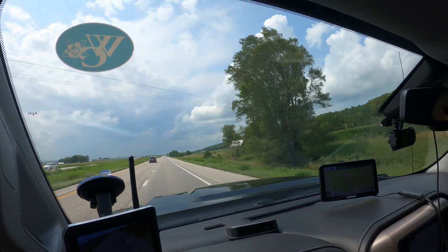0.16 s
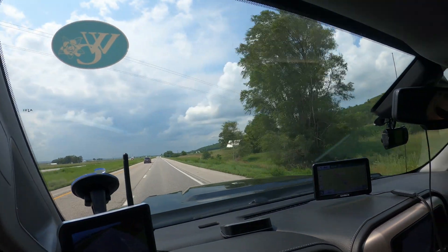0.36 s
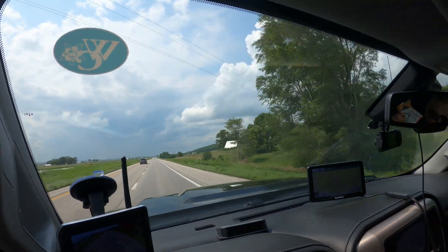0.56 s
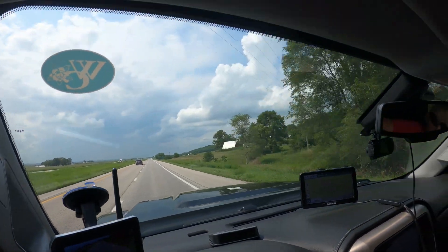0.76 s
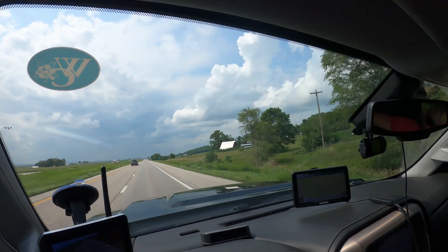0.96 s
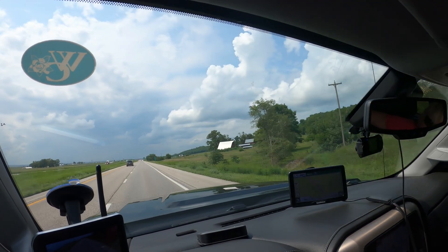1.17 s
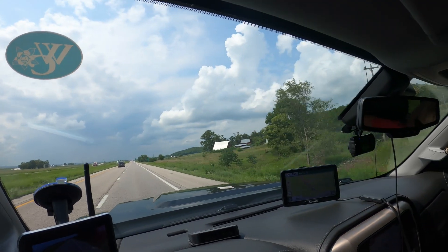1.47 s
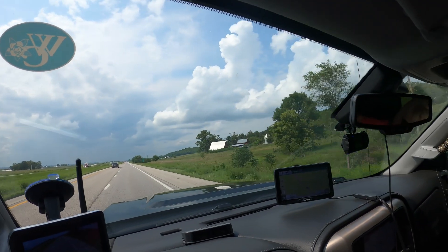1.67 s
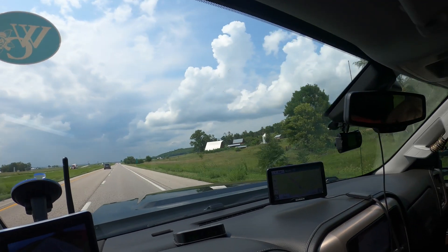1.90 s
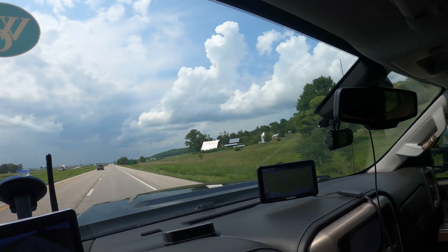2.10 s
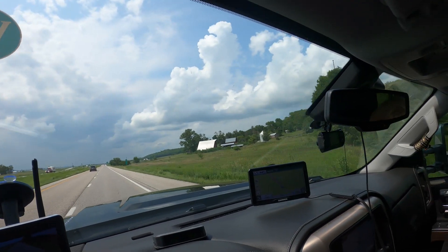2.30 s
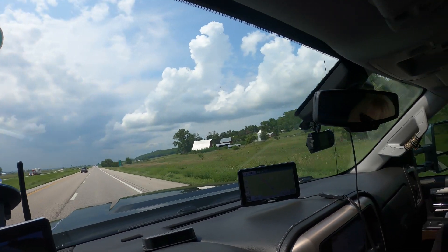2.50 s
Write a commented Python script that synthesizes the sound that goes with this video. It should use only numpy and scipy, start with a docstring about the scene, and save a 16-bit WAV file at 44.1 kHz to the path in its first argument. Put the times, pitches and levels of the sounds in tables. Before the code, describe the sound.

Deep, bassy road roar and engine hum fill a truck cab at steady highway speed, while plastic trim rattles in a quick cluster, creaks faintly, rattles on steadily, then gives small squeaks; close, dull interior microphone.

```python
"""Inside a truck cab at highway speed, 2.65 s. Throughout: wind hiss and tyre roar (coloured noise), cab booms and a
faint tyre whine (resonances, a drifting sine), a deep thrum (fluttering sine), engine hum (sines), rustling trim (grains).
Rattles (ringing noise bursts) crowd the first quarter second; a long creak (resonant noise) follows at 0.55 s.
From 0.87 s rattles come steadily, with a few squeaks (resonant noise).
After 2.1 s squeaks crowd in, with one bright tick, and rattles thin out."""
import sys
import numpy as np
from scipy import signal
from scipy.fft import rfft, irfft
from scipy.io import wavfile
from scipy.ndimage import uniform_filter1d

SR = 44100
rng = np.random.default_rng(int(sys.argv[2]) if len(sys.argv) > 2 else 0)


def dump(signal):
    """Clip the signal to [-1, 1] and save it as 16-bit WAV at the path in sys.argv[1]."""
    limited = np.clip(np.atleast_2d(signal).T, -1, 1)
    pcm = np.round(limited * 32767).astype(np.int16)
    wavfile.write(sys.argv[1], SR, pcm)


N = 116865

# wind hiss spectrum, relative: hz, density_db_per_hz
HISS_SPECTRUM = [(880, -31.5), (1500, -4), (1920, 10.5), (4900, -2), (7320, -39.5), (10800, -43),
                 (12500, -45), (15600, -59)]
HISS_RMS_DB = -62.5

# tyre roar spectrum, relative: hz, density_db_per_hz
ROAR_SPECTRUM = [(8.8, -40), (15, -12), (37, 0), (91, -2), (155, -8.5), (188, -17), (287, -17),
                 (386, -25.5), (421, -29), (591, -29), (731, -31.5), (1050, -37), (1680, -43), (1850, -50),
                 (2400, -55), (3120, -72.5), (5280, -120)]
ROAR_RMS_DB, ROAR_PATCH_DB = -20, 0.59
# cab resonances rung by the road, and a faint tyre whine at 1317 Hz: centre_hz, width_hz, level_db
ROAD_RESONANCES = [(50.4, 3.6, -36.5), (96.8, 5, -31), (150.7, 20.5, -37.5), (186.6, 11, -43),
                   (277.4, 23.3, -42.5), (304.7, 8.3, -44), (366.2, 26, -54), (423.8, 23, -48),
                   (509.6, 37, -52.5), (746, 166, -53), (1317, 28, -60)]
ROAD_STEADINESS, ROAD_DRIFT_RATIO = 0.64, 0.015  # steadiness 0..1; drift rms / centre
# strongest cab boom: time_s, level_db
MAIN_BOOM_LEVEL = [(0.0, -24.5), (0.12, -20.5), (0.32, -44), (0.39, -18), (0.47, -61), (0.58, -21),
                   (0.71, -47.5), (0.86, -15), (0.92, -25.5), (1.09, -17.5), (1.13, -45.5), (2.15, -29),
                   (2.21, -26), (2.25, -34), (2.38, -17), (2.49, -48), (2.58, -42), (2.65, -16.5)]
MAIN_BOOM_HZ, MAIN_BOOM_DRIFT_HZ = 80.97, 3.26  # drift is rms
# surges: time_s, first_firing_order_rms_db, road_low_mid_change_db
SURGE = [(0.0, -43, -5), (0.07, -28, 2), (0.15, -49, -2), (0.28, -28, -0.5), (0.56, -29.5, -0.5),
         (0.64, -48, 0), (0.71, -29, -1), (1.05, -26.5, 1.5), (1.08, -37, -1), (1.63, -25, -0.5),
         (1.71, -32.5, 1.5), (2.65, -28.5, -0.5)]

# low thrum of the cab: time_s, level_db (before flutter), pitch_hz
THRUM = [(0.0, -20.5, 41.1), (0.16, -28.5, 40.45), (0.24, -31.5, 35.22), (0.64, -22.5, 36.04),
         (0.91, -34, 31.9), (0.97, -15, 30.7), (1.02, -25, 32.05), (1.19, -27, 31.5), (1.3, -19, 34.85),
         (1.46, -46, 33.77), (1.5, -20.5, 34.03), (1.68, -21.5, 32.5), (2.07, -25.5, 32.98),
         (2.18, -22.5, 29.06), (2.28, -31.5, 29), (2.37, -25.5, 31.7), (2.53, -23, 33.04),
         (2.65, -45, 33.4)]
THRUM_FLUTTER_DB, THRUM_FLUTTER_S = 4, 0.03  # rms depth, smoothing window

# upper engine firing orders: multiple, rms_db
UPPER_FIRING_ORDERS = [(2, -44), (3, -53.5), (4, -52.5)]
FIRING_HZ, FIRING_WOBBLE_RATIO = 116, 0.00396  # wobble rms / pitch

# loose trim spectrum, relative: hz, density_db_per_hz
TRIM_SPECTRUM = [(880, -13), (1500, 5.5), (1880, 0.5), (2050, -2), (2830, 0.5), (3950, -3), (7620, -12),
                 (9080, -20), (12500, -28), (15600, -38.5)]
# shaking of the trim: time_s, below_treble_db, treble_db
TRIM_SHAKE = [(0, -46.5, -55.5), (.15, -55.5, -60.5), (.24, -52.5, -63), (.27, -59, -68), (.36, -51, -68),
              (.42, -56, -65.5), (.5, -64, -72), (.56, -56.5, -69.5), (.65, -67, -63), (.74, -60, -71),
              (.79, -67.5, -80), (.85, -59.5, -63), (.91, -51, -67), (.97, -54, -61), (1.03, -50.5, -65),
              (1.11, -51, -57.5), (1.16, -51.5, -63), (1.22, -63, -70.5), (1.3, -67, -68),
              (1.35, -67, -76.5), (1.42, -62, -77), (1.46, -51.5, -61.5), (1.52, -53.5, -70),
              (1.565, -56, -72), (1.6, -53.5, -69.5), (1.67, -54, -70.5), (1.72, -64.5, -83),
              (1.78, -49.5, -68), (1.84, -54, -70.5), (1.92, -57, -76), (2.01, -53.5, -71),
              (2.06, -56.5, -76), (2.14, -55.5, -69), (2.2, -59, -75), (2.26, -52.5, -86),
              (2.34, -62.5, -82.5), (2.41, -58, -88), (2.44, -54.5, -84), (2.49, -50, -83),
              (2.56, -64.5, -95.5), (2.65, -76, -86)]
GRAINS_PER_S, GRAIN_SPREAD_DB, GRAIN_T60_S = 3000, 2.2, 0.015
FINE_PATCH_DB, COARSE_PATCH_DB = 1.5, 2

# squeaks of rubbing plastic, with the first rattle's ring (0.001 s) and one bright tick (2.106 s):
# start_s, length_s, centre_hz, width_hz, start_level_db, fade_db
SQUEAKS_AND_TICK = [(0.001, .014, 3030, 300, -49, -6), (0.329, 0.081, 3380, 300, -61.5, -1),
                    (0.46, 0.017, 4070, 120, -48.5, -4.5), (0.453, 0.03, 4600, 250, -56, -5),
                    (0.508, 0.26, 4690, 300, -68, -2), (0.959, 0.06, 3160, 120, -54.5, -3),
                    (1.457, 0.042, 3630, 248, -55, -3.5), (1.459, 0.071, 4840, 300, -60.5, -5),
                    (1.603, 0.047, 3980, 200, -59, -5), (2.088, 0.027, 3400, 120, -56, -3),
                    (2.094, .07, 3540, 110, -60.5, -2), (2.098, 0.11, 7000, 499, -70.5, -4),
                    (2.106, .018, 12900, 3500, -69, -5), (2.121, 0.05, 2576, 80, -59.5, -3),
                    (2.219, 0.05, 3350, 100, -55, -1.5), (2.272, 0.065, 3340, 80.3, -59.5, -4.5),
                    (2.35, 0.037, 3320, 70, -59, -4.5), (2.42, 0.065, 4650, 300, -59.5, -3.5),
                    (2.428, 0.057, 3660, 148.8, -63, 0), (2.409, 0.13, 12500, 2000, -73, -13)]
SQUEAK_STEADINESS = 0.7
# resonances of the long creak: centre_hz, width_hz, relative_db
CREAK_RESONANCES = [(5640, 150, -7), (6090, 300, -4), (6700, 300, -1), (6900, 150, -4), (7560, 80, -3),
                    (7790, 100, -3), (8340, 200, -6), (8820, 200, -9), (7500, 3000, -2), (12100, 700, -12),
                    (13000, 400, -15)]
CREAK_START_S, CREAK_LENGTH_S, CREAK_DB = 0.55, 0.22, -63  # level before the swell window

# rattles: full_level_s, level_db (6 dB above burst rms), ring_hz, ring_db, treble_change_db,
# length_s (rise included, decay not), upper_ring_hz, upper_ring_db
RATTLES = [(0.002, -40, 4470, 8, 3, 0.01, 6130, 15), (0.038, -37, 4560, 0, -2, 0.0059, 5610, -9),
           (0.053, -38, 2900, 15, -5, 0.0092, 5410, -15), (0.0695, -35.5, 2810, 2, 5, 0.0096, 6600, 2),
           (0.096, -43, 2780, -5, 7, 0.012, 5670, -16), (0.134, -42.5, 2560, -17, 4, 0.0088, 5420, -10),
           (0.177, -46.5, 2580, -12, 1, 0.013, 7770, -8), (0.208, -41, 2730, 3, 7, 0.013, 5270, -26),
           (0.223, -43, 2660, 4, 19.5, 0.0094, 5700, -24), (0.439, -43, 2930, -3, 9, 0.012, 5280, -7),
           (0.4585, -43, 4060, -19, 9.5, 0.016, 7420, -8), (0.869, -40.5, 3030, -2, 6, 0.019, 5190, -20),
           (0.8844, -40.5, 4280, 0, 8, 0.014, 5050, -10), (0.934, -55, 3120, -10, 0, 0.012, 5710, -10),
           (0.988, -50, 3140, -9, 10, 0.012, 5970, -10), (1.002, -44, 3080, -13, 20, 0.015, 5030, -3),
           (1.051, -38.5, 3000, 3, 9.5, 0.014, 5910, -21), (1.112, -42.5, 3110, -7, 1, 0.0088, 6700, 1),
           (1.142, -43.5, 3350, -5, 1, 0.01, 5410, -13), (1.176, -42, 2790, -13, 11, 0.012, 5010, -15),
           (1.244, -42.5, 2800, -2, 5, 0.01, 5030, -16), (1.274, -48.5, 2924, -13, 19, 0.011, 7150, -5),
           (1.319, -53, 3160, -3, 4, 0.012, 5000, -3), (1.388, -42, 2480, -1.5, 2, 0.01, 5220, -18),
           (1.449, -41.5, 2790, -12, -1, 0.0082, 5170, -11), (1.48, -47, 2530, 5, -6, 0.012, 5280, -10),
           (1.581, -49.5, 2510, -14, 8, 0.02, 5090, 3), (1.623, -47, 2820, -1, -4, 0.0097, 5130, -4),
           (1.799, -52, 3360, -6, 3, 0.021, 5180, -3), (1.869, -46.5, 3210, -10, 6, 0.014, 5120, -14),
           (1.9696, -40, 2805, -8.5, -11, 0.0089, 5107, -12), (1.992, -47, 2830, -7.5, 2, 0.0094, 4930, -5),
           (2.016, -50.5, 2520, -1, 5, 0.011, 6690, -11), (2.101, -59, 3570, -8, 3, 0.012, 6930, -12),
           (2.247, -50, 3300, 1, 3, 0.011, 5210, -8), (2.472, -58, 2720, 3, 6, 0.01, 5080, -10)]
RATTLE_RISE_S, RATTLE_T60_S, RATTLE_RING_WIDTH_HZ, RATTLE_GRIT_DB = 0.003, 0.047, 410, 1

LIMIT, FADE_IN_S, BAND_EDGE_HZ = 0.6, 0.002, 15700  # LIMIT is full-scale amplitude


def amp(db):
    """Amplitude of a level in dB."""
    return 10 ** (np.asarray(db) / 20)


def evened(x):
    """Scales to rms 1."""
    return x / np.sqrt(np.mean(x ** 2) + 1e-20)


def curve(rows, column=1):
    """A table column interpolated linearly over the scene."""
    rows = np.array(rows)
    return np.interp(np.arange(N) / SR, rows[:, 0], rows[:, column])


def sine(hz):
    """A sine of rms 1 following a pitch curve."""
    return np.sqrt(2) * np.sin(2 * np.pi * np.cumsum(hz) / SR)


def add(mix, start_s, sound):
    """Mixes a sound in place, cut at the end of the scene."""
    part = mix[max(round(start_s * SR), 0):][:len(sound)]
    part += sound[:len(part)]


def colour(x, points):
    """Filters by a dB spectrum on a log-frequency axis, falling away below its first point."""
    point_hz, point_db = np.transpose(points)
    hz = np.fft.rfftfreq(len(x), 1 / SR) + 1
    gain = amp(np.interp(np.log(hz), np.log(point_hz), point_db))
    low_cut = np.minimum(hz / point_hz[0], 1) ** 4
    return irfft(rfft(x) * gain * low_cut, len(x))


def treble(x):
    """The band above 6300 Hz, without phase shift."""
    return signal.sosfiltfilt(signal.butter(3, 6300, "high", fs=SR, output="sos"), x)


def resonate(x, hz, width_hz):
    """A one-pole resonance of gain 1: shift to 0 Hz, smooth, shift back."""
    turn = np.exp(2j * np.pi * np.cumsum(hz * np.ones(len(x))) / SR)
    pole = np.exp(-np.pi * abs(width_hz) / SR)
    return 2 * (turn * signal.lfilter([1 - pole], [1, -pole], x / turn)).real


def ringing(noise, hz, width_hz, steady):
    """Noise through a steep resonance, its swells evened out as far as steady (0..1) asks."""
    x = evened(resonate(resonate(noise, hz, width_hz), hz, width_hz))
    power = uniform_filter1d(x ** 2, int(2 * SR / np.mean(hz)))  # over two cycles
    return evened(x / (power + 0.1) ** (np.clip(steady, 0, 1) / 2))


def patchy(x, patch_db, size, wide, long):
    """Random louder and softer patches in time and frequency."""
    _, _, bins = signal.stft(x, SR, nperseg=size)
    patches = uniform_filter1d(rng.standard_normal(bins.shape), size=wide, axis=0)
    patches = evened(uniform_filter1d(patches, size=long, axis=1))
    return evened(signal.istft(bins * amp(patch_db * patches), SR, nperseg=size)[1][:len(x)])


def sway(size):
    """A random sway of rms 1: noise smoothed over size samples."""
    return evened(uniform_filter1d(rng.standard_normal(N), size=size))


def smooth_sway(size, second_size):
    """A random sway of rms 1, smoothed twice."""
    return evened(uniform_filter1d(sway(size), size=second_size))


def wind():
    """Smooth faint hiss: steady coloured noise."""
    return amp(HISS_RMS_DB) * evened(colour(rng.standard_normal(N), HISS_SPECTRUM))


def surged(x):
    """The low-mid band rises and falls."""
    body = signal.sosfiltfilt(signal.butter(2, [140, 380], "band", fs=SR, output="sos"), x)
    return x + (amp(curve(SURGE, column=2)) - 1) * body


def booms_and_whine():
    """Cab booms and a tyre whine: noise through resonances whose centres drift slowly."""
    out = np.zeros(N)
    for hz, width_hz, level_db in ROAD_RESONANCES:
        drifting_hz = hz * (1 + ROAD_DRIFT_RATIO * smooth_sway(12000, 6000))
        out += amp(level_db) * ringing(rng.standard_normal(N), drifting_hz, width_hz, ROAD_STEADINESS)
    return out


def main_boom():
    """The strongest cab boom: a sine of drifting pitch and changing level."""
    return amp(curve(MAIN_BOOM_LEVEL)) * sine(MAIN_BOOM_HZ + MAIN_BOOM_DRIFT_HZ * sway(4000))


def road():
    """Patchy tyre roar, with the cab booms and tyre whine on it."""
    roar = colour(rng.standard_normal(N), ROAR_SPECTRUM)
    roar = patchy(roar, ROAR_PATCH_DB, size=2048, wide=10, long=4)
    return surged(amp(ROAR_RMS_DB) * roar + booms_and_whine()) + main_boom()


def thrum():
    """A deep wavering, fluttering tone of the whole cab."""
    size = round(THRUM_FLUTTER_S * SR)
    level_db = curve(THRUM) + THRUM_FLUTTER_DB * smooth_sway(size, size)
    return amp(level_db) * sine(curve(THRUM, column=2))


def engine():
    """Sines on the firing orders, sharing one slight pitch wobble."""
    turns = np.cumsum(FIRING_HZ * (1 + FIRING_WOBBLE_RATIO * sway(8000))) / SR
    out = np.zeros(N)
    for order, level_db in [(1, curve(SURGE))] + UPPER_FIRING_ORDERS:
        out += amp(level_db) * np.sqrt(2) * np.sin(2 * np.pi * (order * turns + rng.random()))
    return out


def grit():
    """Dense tiny clicks of uneven size, each a short puff of noise."""
    sizes = amp(GRAIN_SPREAD_DB * np.minimum(rng.exponential(1, N), 5))
    clicks = sizes * (rng.random(N) < GRAINS_PER_S / SR)
    decay = amp(-60 / (GRAIN_T60_S * SR))
    puffs = signal.lfilter([1], [1, -decay], clicks) * rng.standard_normal(N)
    x = patchy(colour(puffs, TRIM_SPECTRUM), FINE_PATCH_DB, size=256, wide=6, long=8)
    return patchy(x, COARSE_PATCH_DB, size=1024, wide=3, long=3)


def rustle():
    """Grit that follows how hard the trim shakes, in two bands."""
    x = grit()
    high = treble(x)
    low = evened(x - high)
    return amp(curve(TRIM_SHAKE)) * low + amp(curve(TRIM_SHAKE, column=2)) * evened(high)


def squeaks_and_tick():
    """Noise through narrow or broad resonances: squeaks, a rattle's ring and a bright tick."""
    out = np.zeros(N)
    for start_s, length_s, hz, width_hz, level_db, fade_db in SQUEAKS_AND_TICK:
        x = ringing(rng.standard_normal(16384), hz, width_hz, SQUEAK_STEADINESS)
        x = evened(x[-round(length_s * SR):])  # the settled end
        level = amp(level_db + np.linspace(0, fade_db, len(x)))
        add(out, start_s, level * signal.windows.tukey(len(x), 0.3) * x)
    return out


def creak():
    """One friction noise through many resonances, swelling and fading."""
    out, rub = np.zeros(N), rng.standard_normal(16384)
    x = sum(amp(db) * ringing(rub, hz, width_hz, steady=0) for hz, width_hz, db in CREAK_RESONANCES)
    x = evened(x)[:round(CREAK_LENGTH_S * SR)]
    add(out, CREAK_START_S, amp(CREAK_DB) * signal.windows.tukey(len(x), 0.8) * x)
    return out


def rattles():
    """Each rattle is a short gritty burst with two ringing patches of plastic."""
    out, t = np.zeros(N), np.arange(4096) / SR
    for full_s, level_db, hz, ring_db, treble_db, length_s, upper_hz, upper_db in RATTLES:
        noise = rng.standard_normal((2, len(t)))
        unevenness = amp(RATTLE_GRIT_DB * evened(uniform_filter1d(noise[1], size=30)))
        burst = evened(colour(noise[0] * unevenness, TRIM_SPECTRUM))
        ring = amp(ring_db) * evened(resonate(burst, hz, RATTLE_RING_WIDTH_HZ))
        upper_ring = amp(upper_db) * evened(resonate(burst, upper_hz, 2 * RATTLE_RING_WIDTH_HZ))
        brightened = burst + (amp(treble_db) - 1) * treble(burst)
        rise = np.minimum(t / RATTLE_RISE_S, 1)
        shape = rise * amp(-60 * np.maximum(t - length_s, 0) / RATTLE_T60_S)
        rattle = evened(brightened + ring + upper_ring)
        add(out, full_s - RATTLE_RISE_S, amp(level_db) * shape * rattle / 2)
    return out


def scene():
    """All layers summed to one channel."""
    background = wind() + road() + thrum() + engine()
    return (background + rustle() + squeaks_and_tick() + creak() + rattles())[None]


def record(dry):
    """Soft limiting of the peaks, a brief fade-in, then the band limit."""
    soft = LIMIT * np.tanh(dry / LIMIT)
    soft = soft * np.minimum(np.arange(N) / SR / FADE_IN_S, 1)
    low_pass = signal.firwin(511, BAND_EDGE_HZ, window=("kaiser", 9), fs=SR)
    return signal.oaconvolve(soft, low_pass[None], "same")


dry = scene()
out = record(dry)
dump(out)
```